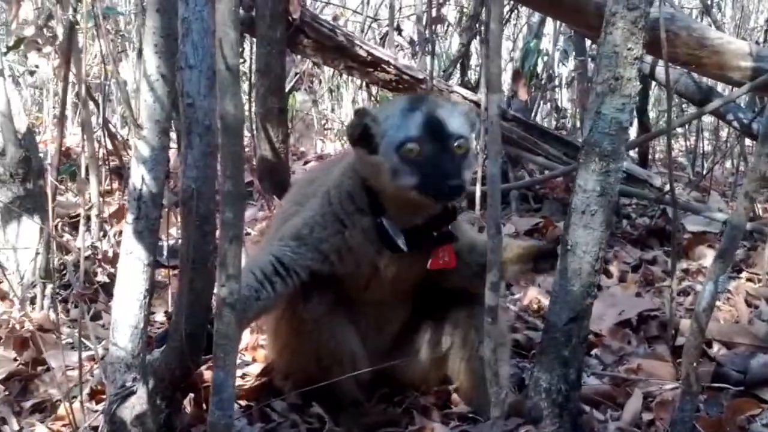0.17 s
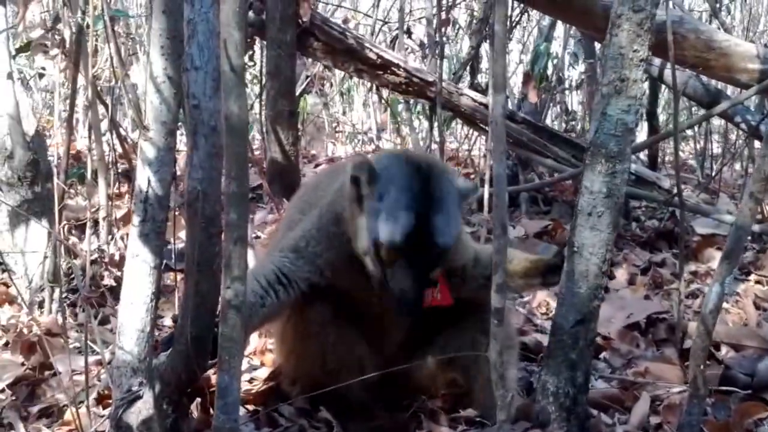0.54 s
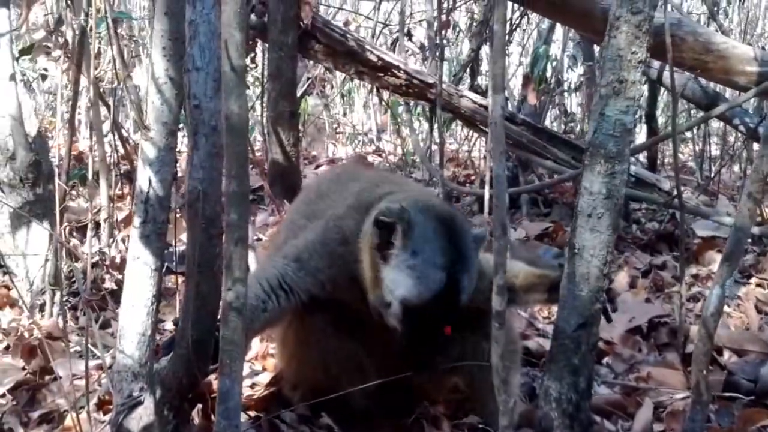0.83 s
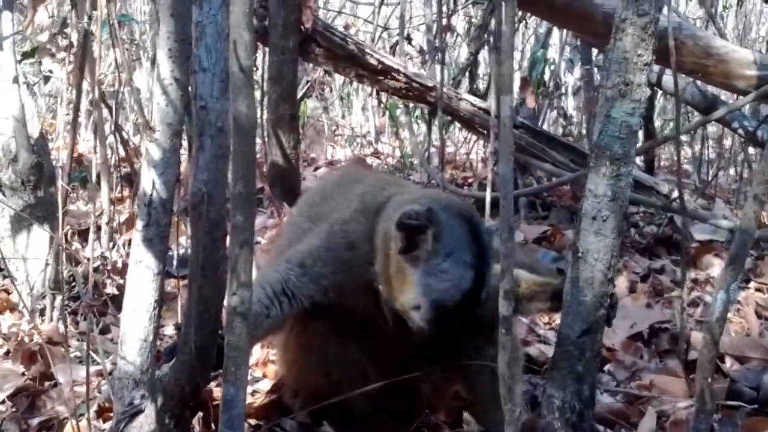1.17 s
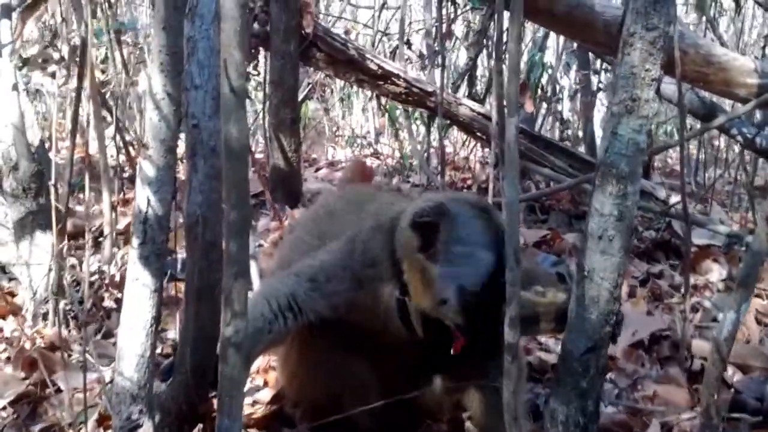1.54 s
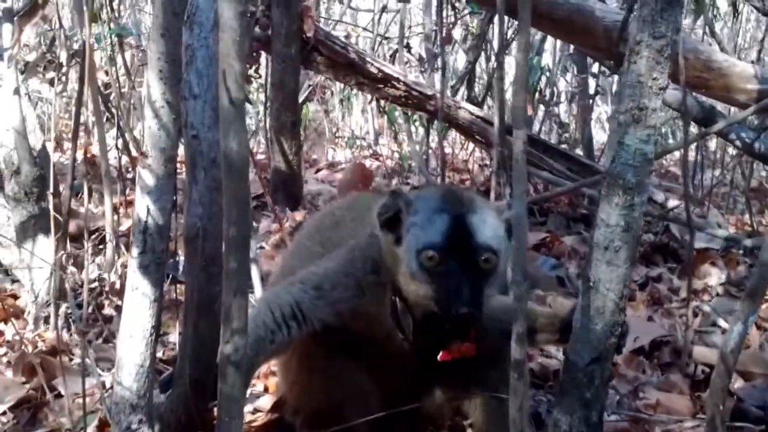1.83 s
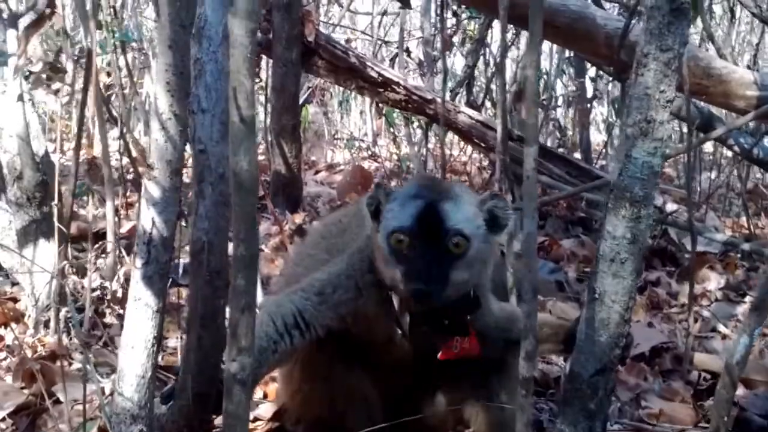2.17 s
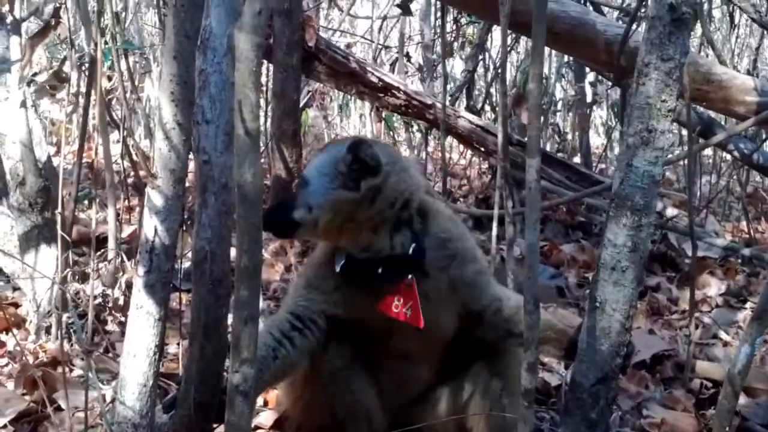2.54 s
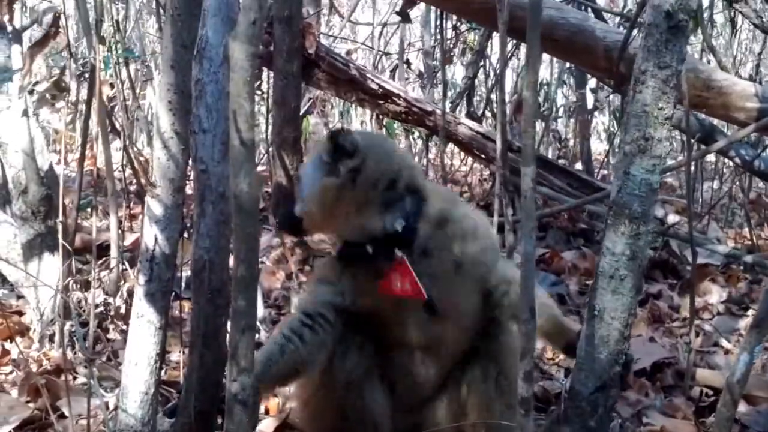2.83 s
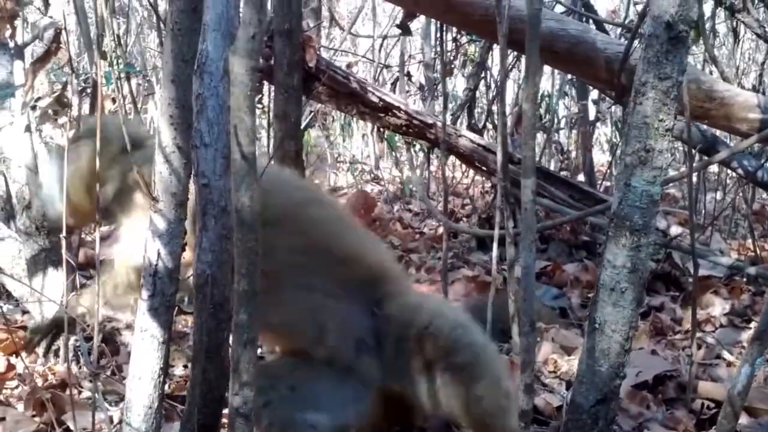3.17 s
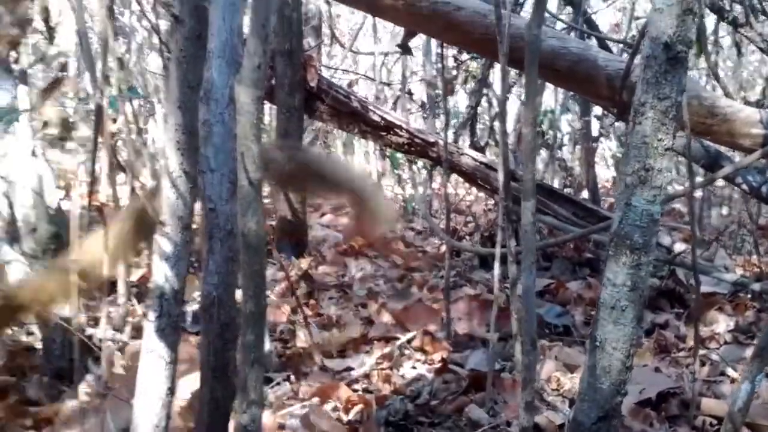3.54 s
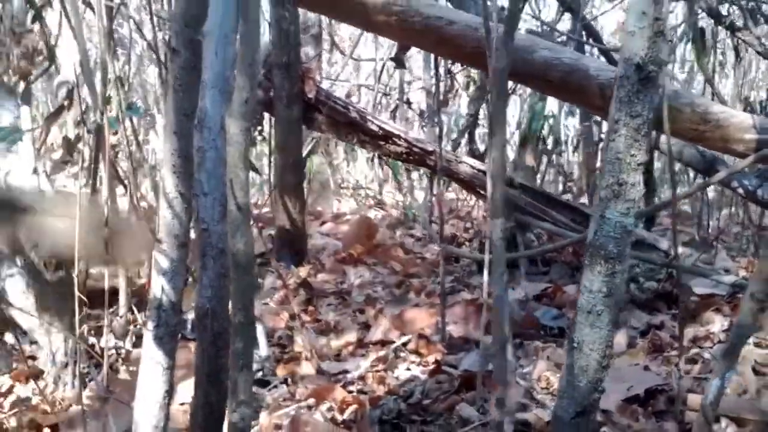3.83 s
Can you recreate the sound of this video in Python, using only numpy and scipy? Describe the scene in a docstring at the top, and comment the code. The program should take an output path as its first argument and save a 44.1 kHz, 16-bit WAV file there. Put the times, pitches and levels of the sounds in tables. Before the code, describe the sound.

Close mono outdoor sound: near-quiet with faint hiss, insect tones and tiny leaf ticks, then soft shifting, sharp bumps, and a sudden burst of brittle leaf crackling as the animal springs away.

```python
"""Forest floor: a lemur shifts on dry leaf litter, then bounds away; the same mono sound feeds both channels.
Presses drive clumps of tiny damped cracks and sliding hiss; enveloped noise makes snaps, thuds and twig clicks.
Twigs add a ringing sine; damped modes make dull bumps close to the microphone; wavering noise is fur brushing.
Behind lie steady filtered hiss, unsteady low rumble, two narrow insect bands and one faint falling whistle."""
import sys
import numpy as np
from scipy import signal
from scipy.fft import rfft, irfft, next_fast_len
from scipy.io import wavfile
from scipy.ndimage import uniform_filter1d, map_coordinates

SR = 44100
rng = np.random.default_rng(int(sys.argv[2]) if len(sys.argv) > 2 else 0)


def wav_record(signal):
    """Record a signal, one row per channel, as 16-bit PCM in the file named by sys.argv[1]."""
    frames = np.transpose(np.atleast_2d(signal))
    bounded = np.clip(frames, -1, 1)
    # unit amplitude maps onto the largest positive 16-bit level
    quanta = np.round(bounded * 32767).astype(np.int16)
    wavfile.write(sys.argv[1], SR, quanta)


N = 176400
TOP_HZ = 15850  # upper limit of crack pitches and of the whole mix

# Leaf spectrum: hz, gain_db
LEAF_COLOUR = [(60, -40), (150, -24), (350, -16), (750, -16), (980, -12), (1200, -15), (1600, -12.5),
               (2100, -13.5), (2700, -8.5), (4000, -8), (6200, -7), (8300, -7.5), (10500, -4), (12900, 0),
               (15600, -1.5)]


def amp(db):
    """Decibels to gain."""
    return 10 ** (np.asarray(db) / 20)


def unit(x):
    """Scale to rms 1."""
    return x / np.sqrt(np.mean(x ** 2) + 1e-20)


def decay(t_s, t60_s, start_db=0):
    """Exponential decay from start_db, losing 60 dB per t60_s."""
    return amp(start_db - 60 * t_s / t60_s)


def curves(rows):
    """Interpolate each column after the time to one value per sample."""
    s, *cols = np.transpose(rows)
    return [np.interp(np.arange(N) / SR, s, c) for c in cols]


def wobble(knots_per_s):
    """Smooth random curve: spline through Gaussian knots."""
    return map_coordinates(rng.standard_normal(N // 8), [np.arange(N) * knots_per_s / SR], mode="mirror")


def coloured(x, points):
    """Causal minimum-phase filter through (hz, gain_db) points, by folding the cepstrum."""
    m = 2 * next_fast_len(len(x))
    hz, db = np.transpose(points)
    gain_db = np.interp(np.log(np.fft.rfftfreq(m, 1 / SR) + 1), np.log(hz), db)
    cep = irfft(np.log(amp(gain_db)))
    cep[1:m // 2] *= 2
    cep[m // 2 + 1:] = 0
    response = np.exp(rfft(cep))
    return irfft(rfft(x, m) * response)[:len(x)]


def add(out, start_s, peak_db, sound):
    """Mix a short sound into out at the given peak level."""
    part = out[round(start_s * SR):][:len(sound)]
    part += amp(peak_db) * sound[:len(part)] / np.abs(sound).max()


def hiss():
    """Even forest hiss: steady filtered noise."""
    # Floor spectrum: hz, gain_db
    floor_colour = [(25, -2), (60, -2), (110, -6), (220, -8.5), (450, -11.5), (700, -12.5), (1100, -14),
                    (2000, -15.5), (4500, -17), (7000, -16.5), (9500, -15.5), (11500, -12), (13500, -11.3),
                    (15600, -14)]
    level_db = -62.7
    return amp(level_db) * unit(coloured(rng.standard_normal(N), floor_colour))


def rumble(flutter_db=2.5, flutters_per_s=18):
    """Unsteady low rumble: filtered noise with a fluttering level."""
    # Level: time_s, level_db
    level_curve = [(0, -83), (.95, -84), (1.3, -70), (1.5, -74), (1.67, -67), (1.9, -77), (2.5, -81),
                   (2.75, -77), (3.0, -79), (3.08, -71), (3.15, -78), (3.6, -66), (3.78, -70), (3.89, -59),
                   (4, -64)]
    # Spectrum: hz, gain_db
    rumble_colour = [(25, 0), (60, 1), (160, 0), (300, -9), (800, -25), (2500, -45)]
    noise = coloured(rng.standard_normal(N), rumble_colour)
    flutter = amp(flutter_db * wobble(flutters_per_s))
    return amp(curves(level_curve)[0]) * unit(flutter * noise)


def narrow_band(rows, width_hz):
    """Fuzzy wavering line: two slow random curves modulate a carrier in quadrature."""
    waver_db, wavers_per_s = 1.3, 14
    hz, db = curves(rows)
    phase = 2 * np.pi * np.cumsum(hz) / SR
    line = wobble(2 * width_hz) * np.cos(phase) + wobble(2 * width_hz) * np.sin(phase)
    waver = amp(waver_db * wobble(wavers_per_s))
    return amp(db) * unit(waver * line)


def insects():
    """Two thin insect bands of noise, one rising in pitch, one nearly steady."""
    # Each band: time_s, pitch_hz, level_db
    rising_band = [(0, 5680, -78), (.9, 6000, -77), (1.7, 6230, -79), (2.5, 6520, -78), (4, 6950, -77)]
    steady_band = [(0, 7500, -80), (2, 7520, -78), (4, 7600, -80)]
    return narrow_band(rising_band, width_hz=190) + narrow_band(steady_band, width_hz=300)


def low_part(x):
    """Zero-phase low-pass: the part of a leaf sound below its fizz."""
    edge_hz = 8000  # light touches stir little below this
    return signal.sosfiltfilt(signal.butter(3, edge_hz, fs=SR, output="sos"), x)


def cracks():
    """Dense spray of tiny damped cracks of random pitch and size, at an even mean level."""
    cracks_per_s, spread_db, ring_s = 8000, 3.2, .0014
    draw = rng.random((int(cracks_per_s * N / SR), 4))
    when, pitch, size, life = draw.T[:, :, None]
    k = np.arange(SR // 500)
    size_db = -spread_db * np.log(np.maximum(size, .01))  # many small, few large
    t60_s = ring_s * (.5 + life)
    grains = decay(k / SR, t60_s, size_db) * np.cos(2 * np.pi * pitch * TOP_HZ * k / SR)
    grains *= rng.choice([-1, 1], when.shape)
    place = (when * N).astype(int) + k
    spray = np.bincount(place.ravel(), grains.ravel(), N)[:N]
    spray = coloured(spray, LEAF_COLOUR)
    local_power = np.abs(uniform_filter1d(spray ** 2, size=1300))
    return spray / np.sqrt(local_power + 1e-12)


def rustle():
    """Body and feet press: force swells, holds and dies, driving clumped cracks and sliding hiss."""
    # Presses: start_s, length_s, drive_db, release_t60_s, low_part_db (relative to the drive)
    presses = [(.524, .012, -64, .1, -5), (.842, .011, -58.5, .1, -10), (1.065, .04, -66, .1, -3),
               (1.33, .012, -64, .1, -8), (1.531, .015, -65, .1, -8), (2.511, .17, -64, .15, -7),
               (2.544, .028, -55, .1, -4), (2.659, .01, -60, .1, -3), (2.81, .11, -67, .15, -3),
               (2.857, .008, -56, .08, -2), (2.879, .008, -52, .08, -6), (2.988, .195, -58, .1, -5),
               (3.026, .012, -47, .07, -10), (3.066, .029, -48, .1, -11), (3.16, .025, -56, .1, -8),
               (3.183, .015, -44, .1, 0), (3.195, .055, -38, .1, -2), (3.24, .012, -37, .1, 0),
               (3.252, .048, -30.5, .17, 1), (3.314, .02, -33, .06, -1), (3.33, .18, -36, .1, -1),
               (3.429, .02, -36, .1, -2), (3.455, .006, -24, .04, -5), (3.509, .008, -32, .1, 2),
               (3.516, .015, -25, .11, 2), (3.561, .016, -26, .15, -2), (3.585, .065, -37, .4, -1),
               (3.672, .035, -41, .2, -2), (3.719, .052, -38, .24, -2.5), (3.846, .016, -46, .16, -2),
               (3.89, .07, -59, .25, -3)]
    attack_s = .006
    crack_db, slide_db = .4, -4
    clump_db, clumps_per_s = 1.4, 300
    stir_db, stir_swing_db, stirs_per_s = -72, 5, 35  # leaves settling faintly all the time
    t = np.arange(N) / SR
    stir = amp(stir_db) * unit(amp(stir_swing_db * wobble(stirs_per_s)))
    fizz_power = stir ** 2
    low_power = np.zeros(N)
    for start_s, length_s, drive_db, release_s, low_db in presses:
        swell = np.clip((t - start_s) / attack_s, 0, 1)
        force = swell * decay(np.maximum(t - start_s - length_s, 0), release_s, drive_db)
        fizz_power += force ** 2
        low_power += (force * amp(low_db)) ** 2
    slide = unit(coloured(rng.standard_normal(N), LEAF_COLOUR))
    clumps = unit(amp(clump_db * wobble(clumps_per_s)))
    leaves = clumps * (amp(crack_db) * cracks() + amp(slide_db) * slide)
    low = low_part(leaves)
    return np.sqrt(fizz_power) * (leaves - low) + np.sqrt(low_power) * low


def brush(flutter_db=2, flutters_per_s=40):
    """Fur rubs the litter as the animal turns and rises: soft uneven noise, duller than the cracks."""
    # Level: time_s, level_db
    level_curve = [(0, -90), (1.0, -88), (1.1, -76), (1.7, -74), (2.0, -84), (2.48, -84), (2.55, -73),
                   (2.8, -73), (2.87, -66), (2.96, -73), (3.03, -68), (3.18, -67), (4, -76)]
    # Spectrum: hz, gain_db
    brush_colour = [(100, -15), (500, -3), (1800, -1), (3300, 0), (5000, -7), (12000, -22)]
    noise = coloured(rng.standard_normal(N), brush_colour)
    rub = amp(flutter_db * wobble(flutters_per_s)) * noise
    return amp(curves(level_curve)[0]) * unit(rub)


def snaps():
    """Single brittle leaves break: a sharp noise burst and a short shiver."""
    # Snaps: start_s, peak_db, low_part_db (gain below the fizz)
    breaks = [(.2415, -40, -6), (1.3719, -49, 6), (1.713, -46, 3), (1.9099, -45, 1), (2.5497, -39, -6),
              (2.883, -35, -8), (2.9666, -35, -16), (3.0347, -33, -10), (3.0728, -30, -5),
              (3.092, -31, -14), (3.1682, -41, -6), (3.2054, -15, 2), (3.208, -15, -3), (3.2851, -17, 0),
              (3.2895, -17, 0), (3.3193, -14, -2), (3.327, -9.5, 0), (3.3338, -14, -3), (3.4597, -14, -6),
              (3.4874, -15, -1), (3.5602, -13, -6), (3.5684, -10, 0), (3.5995, -19, -6), (3.81, -27, -4),
              (3.8855, -28, -12)]
    burst_t60_s, tail_db, tail_t60_s = .005, -18, .025
    out, t = np.zeros(N), np.arange(SR // 20) / SR
    shape = decay(t, burst_t60_s) + decay(t, tail_t60_s, tail_db)
    for start_s, peak_db, low_db in breaks:
        burst = coloured(shape * rng.standard_normal(len(t)), LEAF_COLOUR)
        low = low_part(np.pad(burst, 64))[64:-64]
        add(out, start_s, peak_db, burst + (amp(low_db) - 1) * low)
    return out


def bumps():
    """Dull bumps near the microphone: one heavily damped body is knocked; softer contacts lose their top."""
    # Bumps: start_s, peak_db, upper_edge_hz
    knocks = [(.3695, -55, 1400), (.431, -48, 2400), (1.056, -57, 600), (1.1247, -48, 2200),
              (1.2272, -57, 500), (1.3167, -50, 1700), (1.3315, -51, 450), (1.476, -52, 450),
              (1.5775, -57, 400), (1.669, -54, 200), (1.69, -57, 250), (1.712, -51, 3500),
              (1.8172, -55, 500), (2.119, -59, 500), (2.683, -53, 400), (2.7135, -54, 500),
              (2.7205, -34.5, 2400), (2.7618, -42, 2700), (2.7665, -33, 1500), (2.795, -50, 900),
              (3.853, -38, 4000), (3.8852, -32, 6000), (3.9513, -37, 1300), (3.954, -41, 700),
              (3.97, -53, 300)]
    # Modes of the body: hz, level_db, t60_s
    modes = [(310, -8, .02), (500, -6, .008), (800, 0, .004), (1450, -1, .0035), (2400, -5, .002),
             (4200, 0, .0015)]
    low_edge_hz = 190
    out, t = np.zeros(N), np.arange(SR // 20) / SR
    ring = sum(decay(t, t60_s, db) * np.sin(2 * np.pi * hz * t) for hz, db, t60_s in modes)
    ring = signal.sosfilt(signal.butter(2, low_edge_hz, "high", fs=SR, output="sos"), ring)
    for start_s, peak_db, edge_hz in knocks:
        low_pass = signal.butter(4, edge_hz, fs=SR, output="sos")
        add(out, start_s, peak_db, signal.sosfilt(low_pass, ring))
    return out


def twigs(click_db=-4, click_t60_s=.005):
    """Twigs tick: a noise click and a brief damped ring on one note."""
    # Ticks: start_s, peak_db, ring_hz, ring_t60_s
    ticks = [(1.372, -55, 5300, .008), (2.5497, -50, 1750, .013), (3.488, -20, 6950, .014),
             (3.853, -40, 4700, .006), (3.857, -42, 6600, .03), (3.8852, -35, 4500, .014)]
    out, t = np.zeros(N), np.arange(SR // 20) / SR
    for start_s, peak_db, hz, t60_s in ticks:
        click = decay(t, click_t60_s, click_db) * rng.standard_normal(len(t))
        ring = decay(t, t60_s) * np.sin(2 * np.pi * hz * t)
        add(out, start_s, peak_db, click + ring)
    return out


def whistle():
    """Faint, far falling whistle: a very narrow wavering band."""
    # Glide: time_s, pitch_hz, level_db
    glide = [(1.68, 7150, -95), (1.73, 6950, -80), (1.8, 6720, -72), (1.92, 6570, -78), (2.03, 6530, -72),
             (2.15, 6520, -81), (2.25, 6500, -100)]
    return narrow_band(glide, width_hz=30)


def thuds():
    """Soil takes the weight of the feet: soft low puffs of decaying noise."""
    # Thuds: start_s, peak_db
    footfalls = [(3.268, -43), (3.297, -46), (3.473, -46), (3.515, -38), (3.567, -45), (3.583, -47),
                 (3.604, -41), (3.62, -45)]
    # Spectrum: hz, gain_db
    thud_colour = [(30, -10), (110, 0), (250, -1), (450, -3), (900, -13), (2500, -38)]
    out, t = np.zeros(N), np.arange(SR // 10) / SR
    for start_s, peak_db in footfalls:
        puff = decay(t, t60_s=.05) * rng.standard_normal(len(t))
        add(out, start_s, peak_db, coloured(puff, thud_colour))
    return out


def scene():
    """Sum all sources at one microphone that feeds both channels."""
    background = hiss() + rumble() + insects() + whistle()
    animal = rustle() + brush() + snaps() + twigs() + thuds()
    mono = background + animal + bumps()
    return np.array([mono, mono])


def record(dry):
    """Brick-wall low-pass: nothing is kept from TOP_HZ up."""
    m = next_fast_len(N + SR // 2)
    keep = np.fft.rfftfreq(m, 1 / SR) < TOP_HZ
    return irfft(rfft(dry, m) * keep, m)[:, :N]


dry = scene()
out = record(dry)
wav_record(out)
```